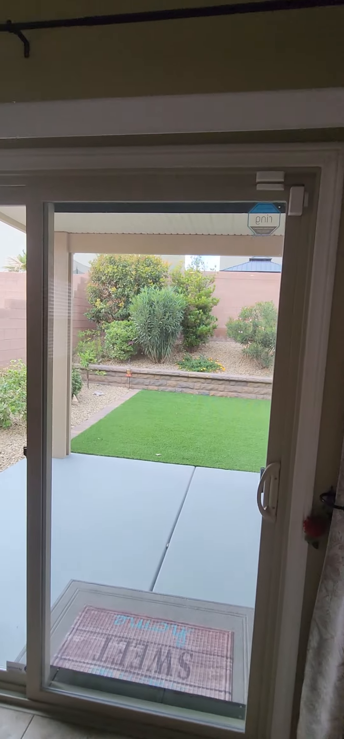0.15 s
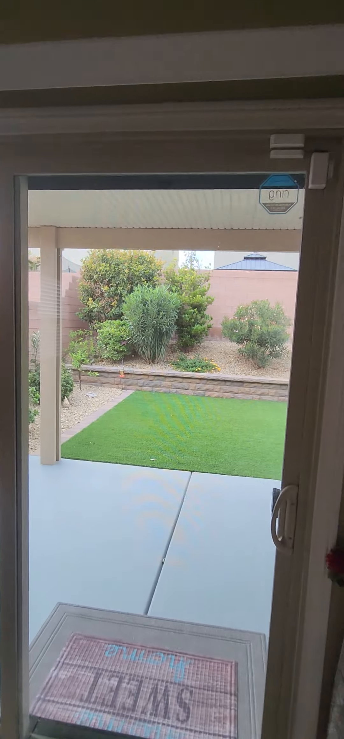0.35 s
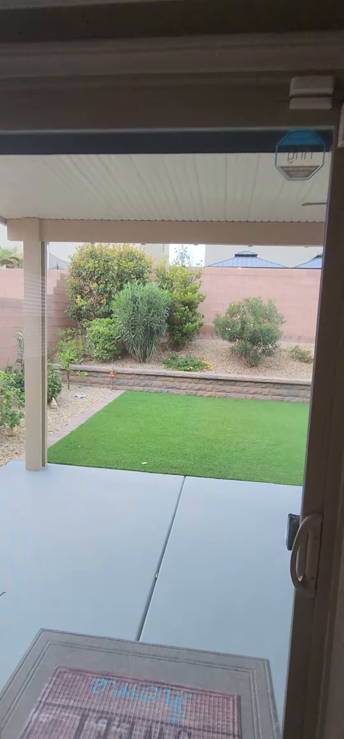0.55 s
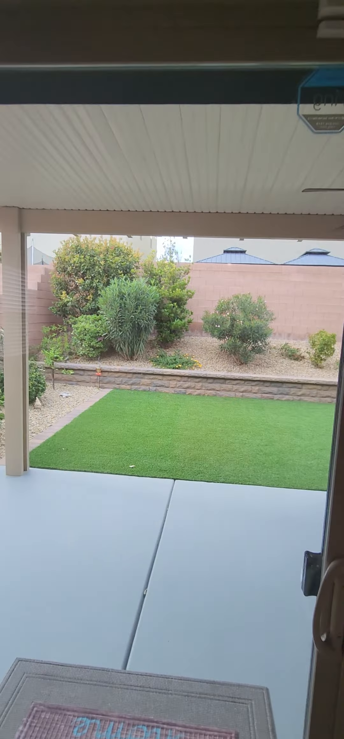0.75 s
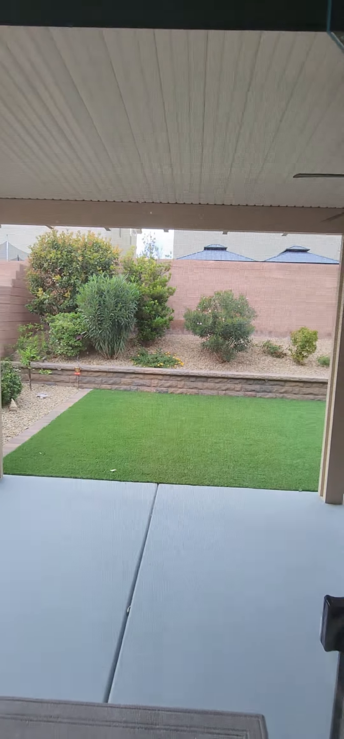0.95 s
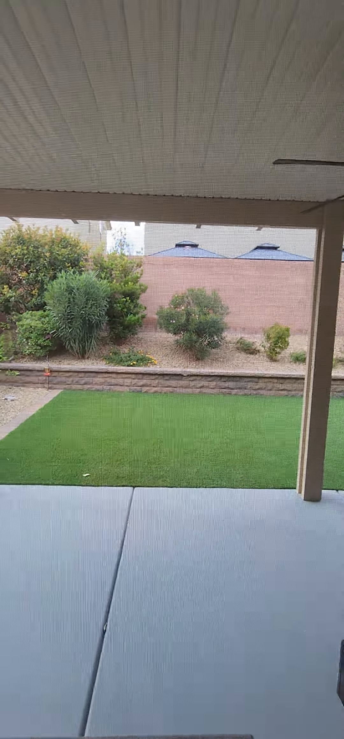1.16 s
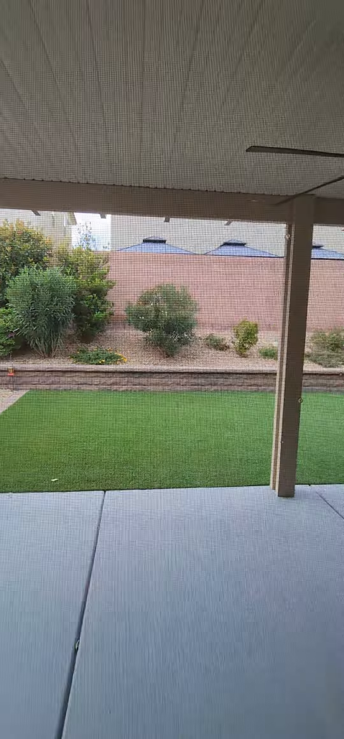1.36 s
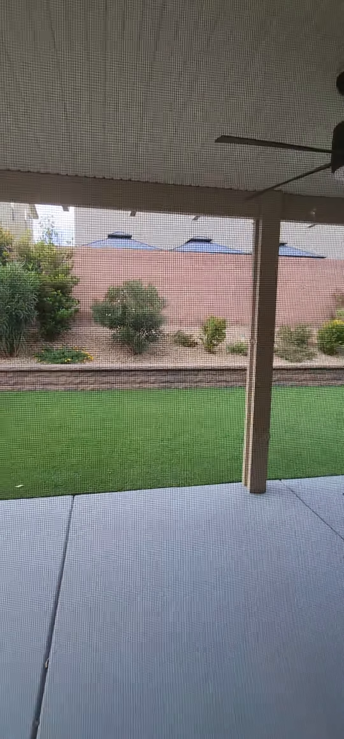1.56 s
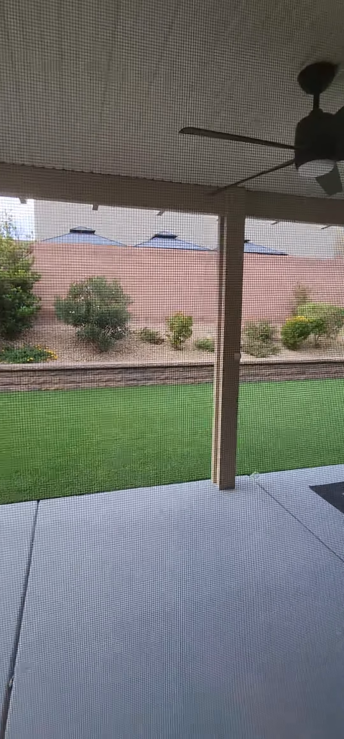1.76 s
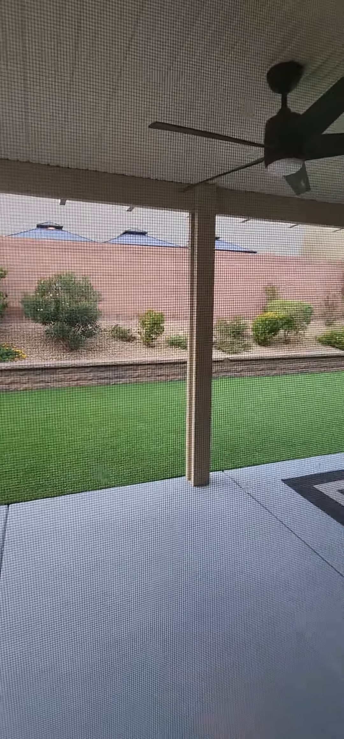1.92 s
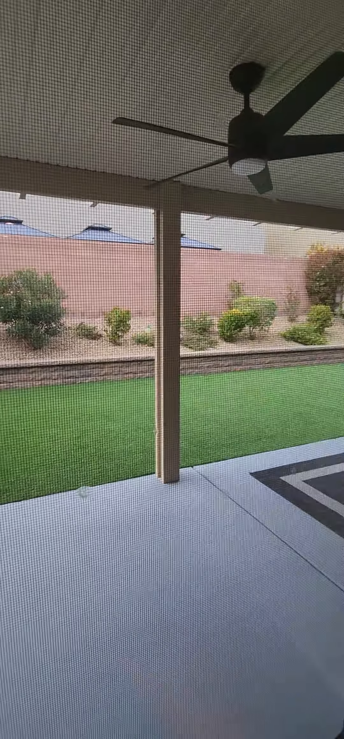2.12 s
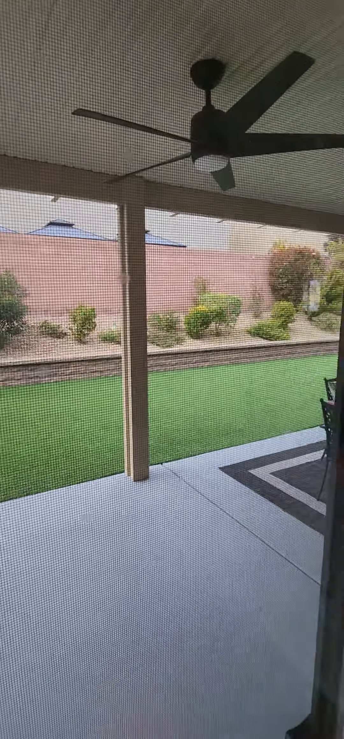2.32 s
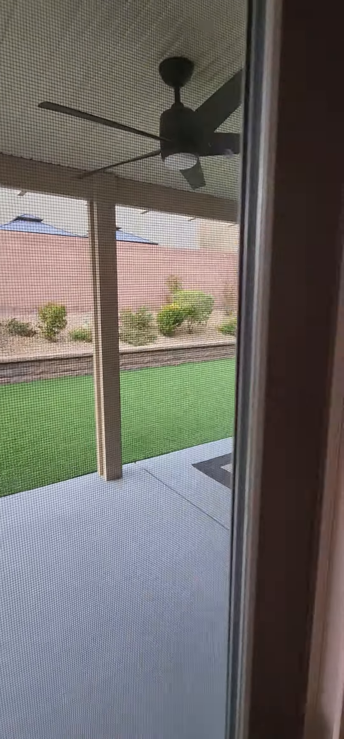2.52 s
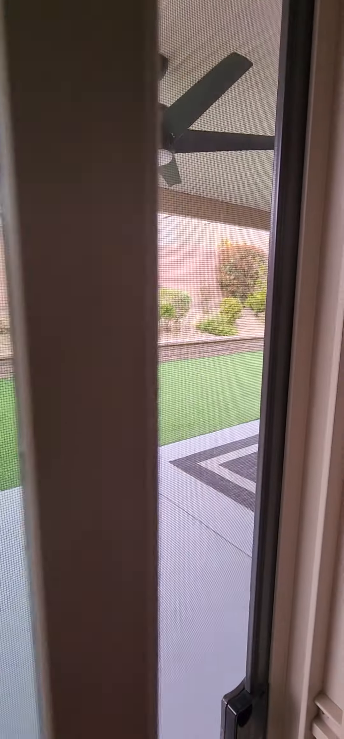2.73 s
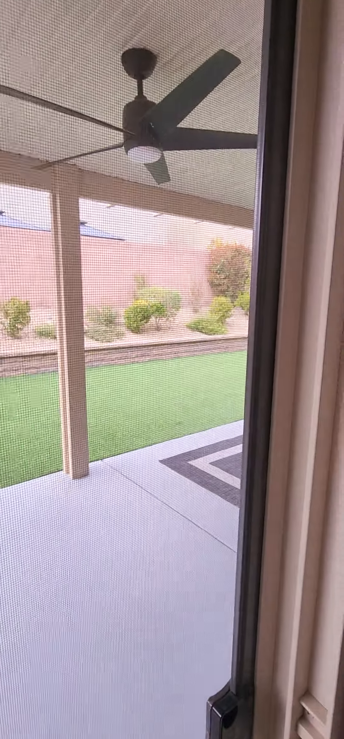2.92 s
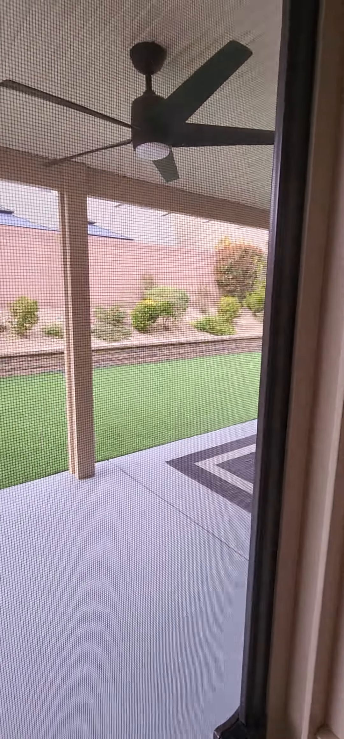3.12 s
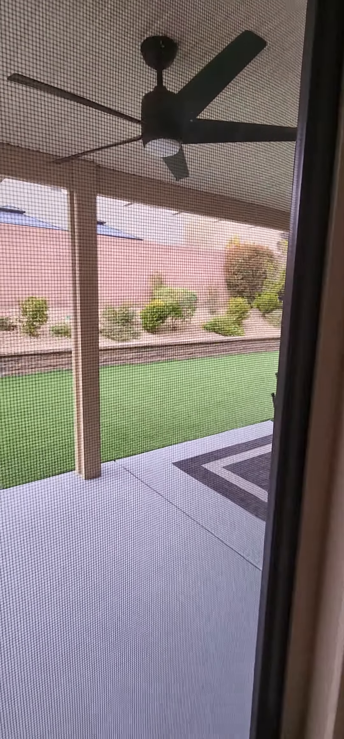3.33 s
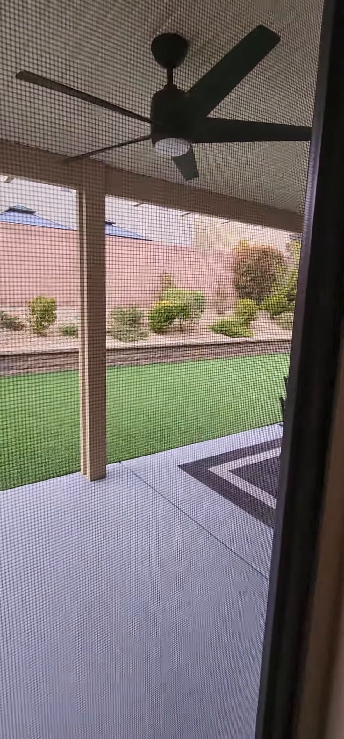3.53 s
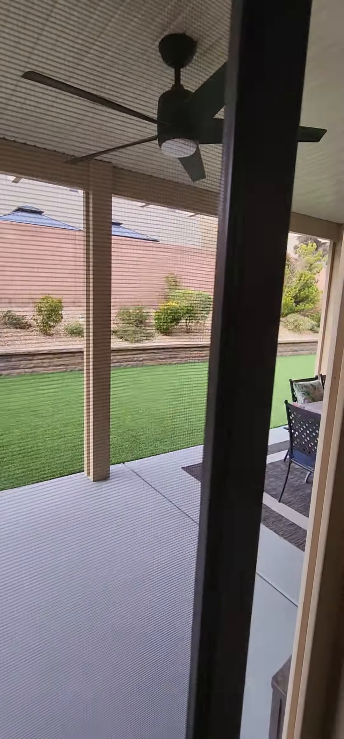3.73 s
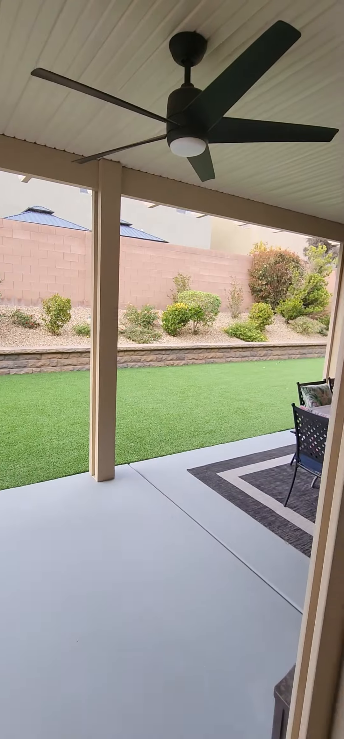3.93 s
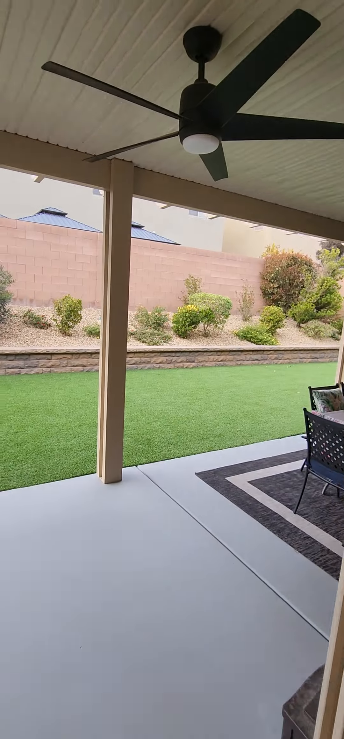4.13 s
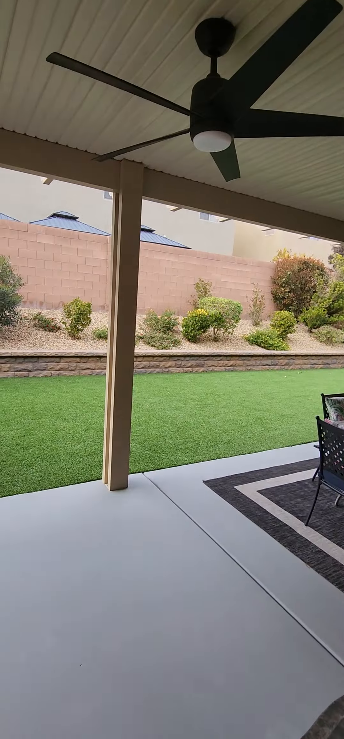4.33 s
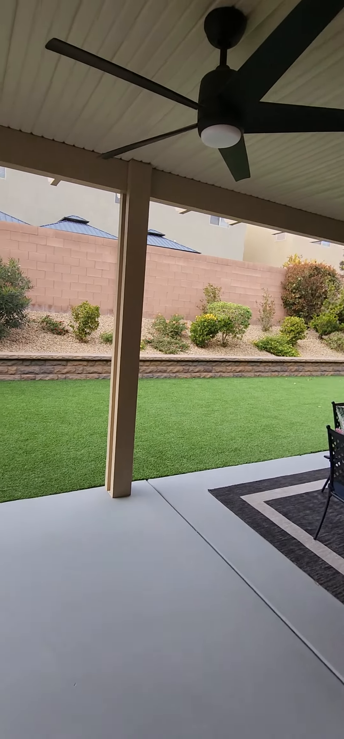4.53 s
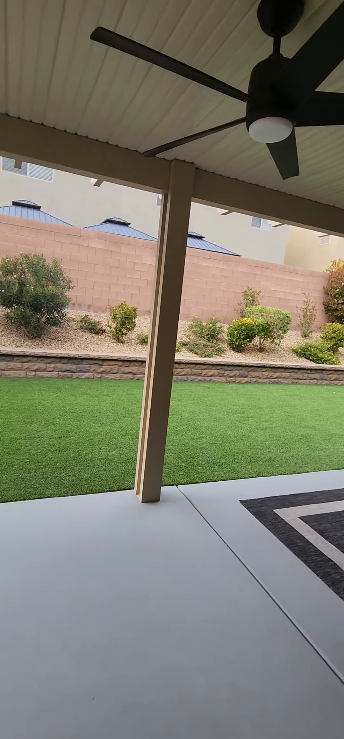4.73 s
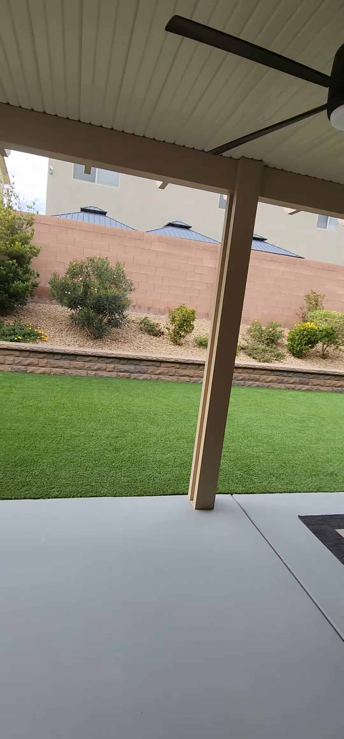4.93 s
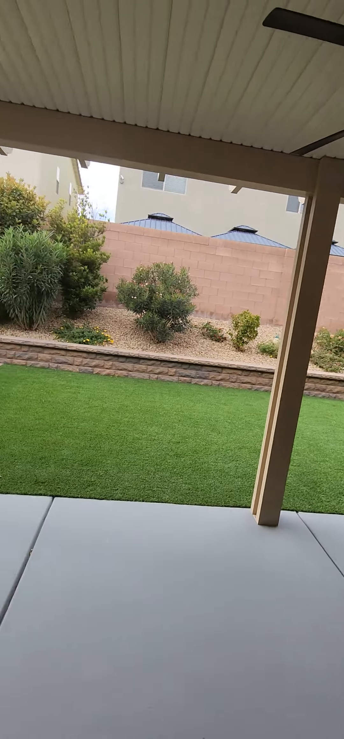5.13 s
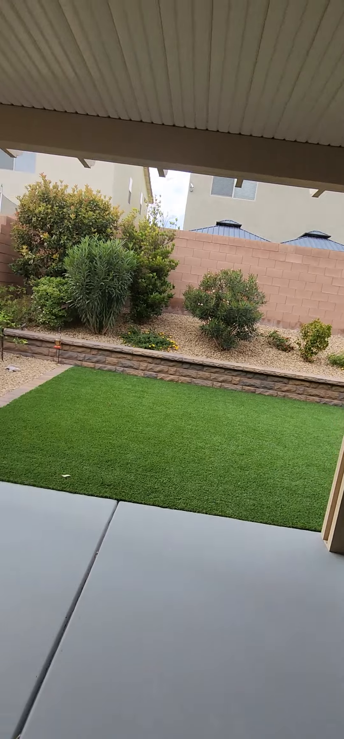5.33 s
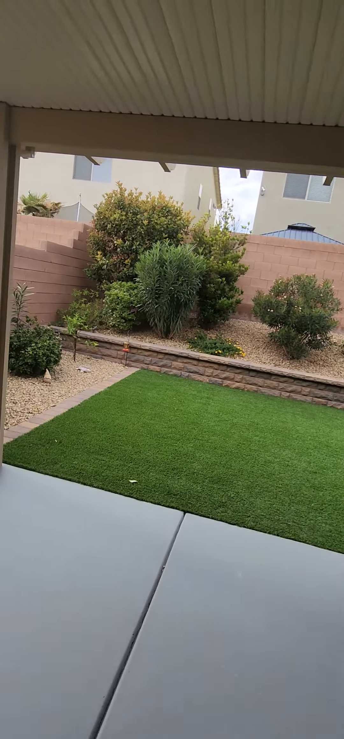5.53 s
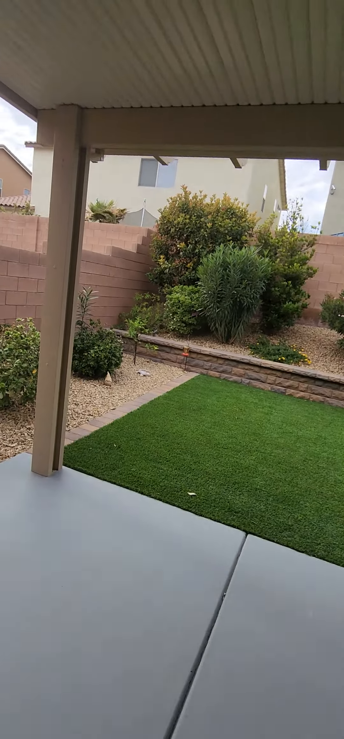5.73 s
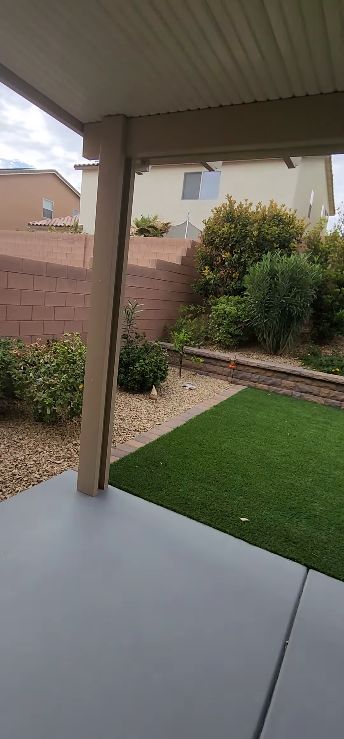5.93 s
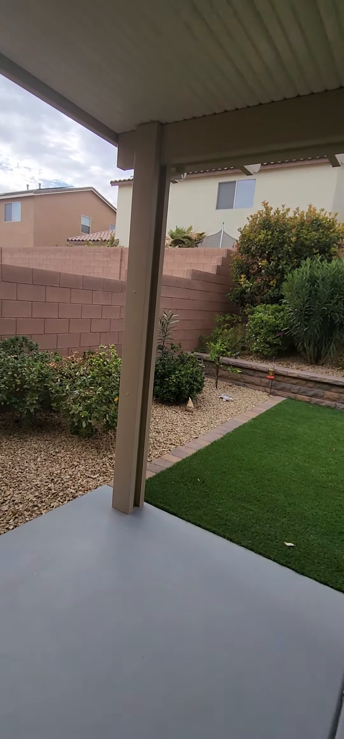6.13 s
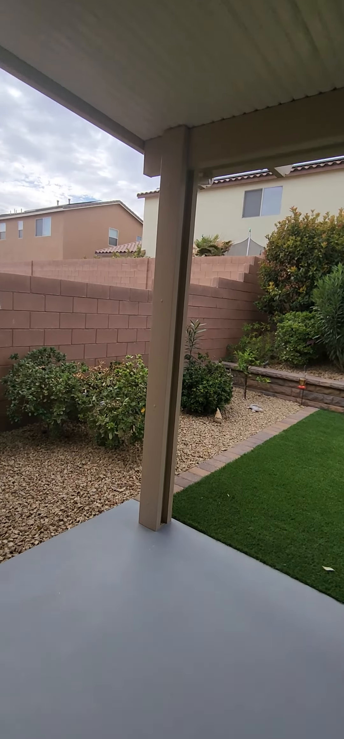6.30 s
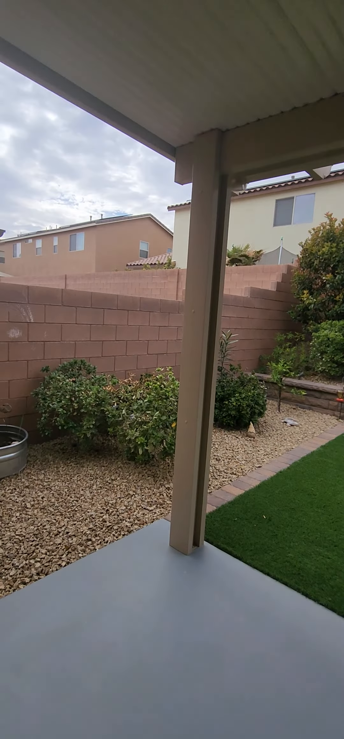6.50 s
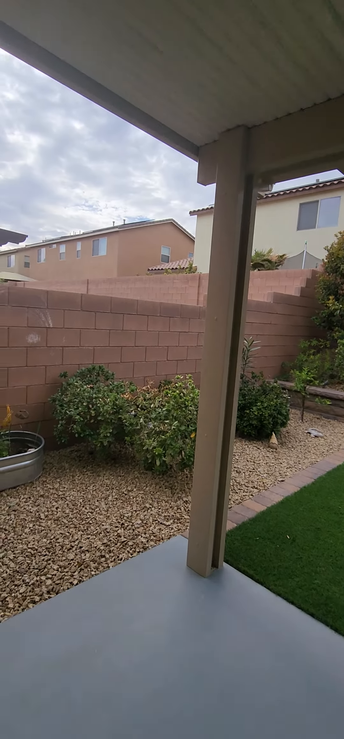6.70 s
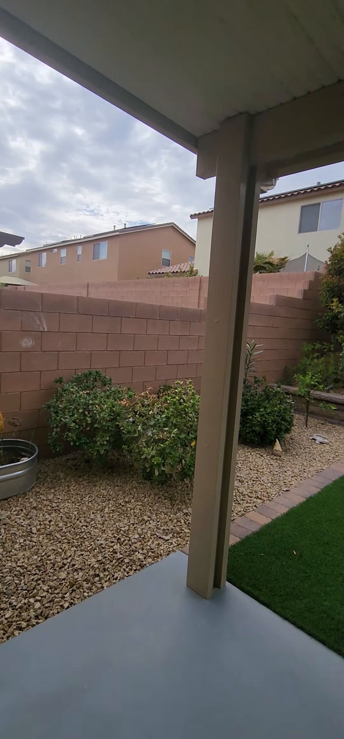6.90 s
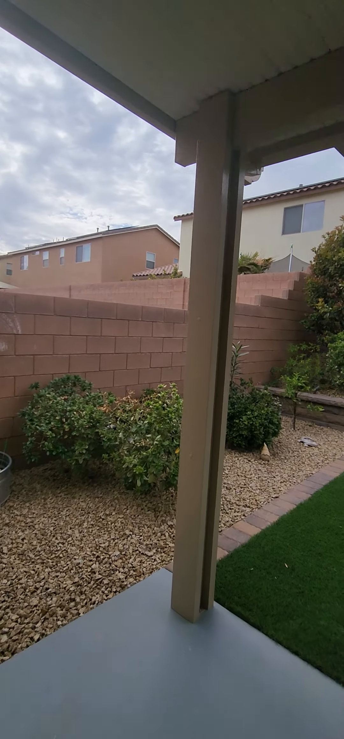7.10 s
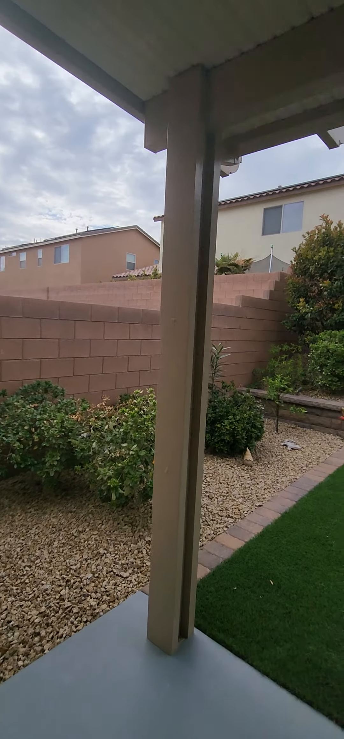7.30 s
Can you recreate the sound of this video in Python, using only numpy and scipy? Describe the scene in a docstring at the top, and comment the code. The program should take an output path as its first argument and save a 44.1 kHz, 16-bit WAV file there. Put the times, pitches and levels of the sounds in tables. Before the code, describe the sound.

A sliding glass door unlatches with a sharp metallic snap and rumbles open, then a screen door rattles aside and footsteps go outside.

```python
"""A living room with a sliding glass patio door, heard from a phone in the hand.
Soles scuff over a hard floor; the sprung latch snaps open and rings the aluminium frame.
The handle squeaks; the panel tears from its seal with a low boom and rumbles along the track.
The light screen door rattles aside on worn rollers. Steps lead into a quiet yard; a far car passes."""
import sys
import numpy as np
from scipy import signal
from scipy.fft import rfft, irfft
from scipy.io import wavfile
from scipy.ndimage import uniform_filter1d

SR = 44100
rng = np.random.default_rng(int(sys.argv[2]) if len(sys.argv) > 2 else 0)


def bounce(signal):
    """Save signal as a 16-bit WAV file at the path given by the first command-line argument."""
    frames = np.transpose(np.atleast_2d(signal))
    limited = np.clip(frames, -1, 1)
    pcm = np.round(limited * 32767).astype(np.int16)
    wavfile.write(sys.argv[1], SR, pcm)


N = 324443
T = np.arange(N) / SR
HIT_T = T[:SR // 2]


def undb(db):
    """Decibels to gain."""
    return 10 ** (np.asarray(db) / 20)


def unit(x):
    """Scale to rms 1."""
    return x / np.sqrt(np.mean(x ** 2))


def peak(x, db):
    """Scale to a peak level."""
    return x * undb(db) / np.abs(x).max()


def add(track, start_s, sound):
    """Mix a sound in at a time."""
    i = int(start_s * SR)
    track[i:i + len(sound)] += sound[:N - i]


def noise():
    """White noise."""
    return rng.standard_normal(N)


def wander(per_s):
    """Random drift, spread near 1."""
    knots = rng.standard_normal(N // 20)
    return np.interp(T * per_s, np.arange(len(knots)), knots)


def grit(per_s, spread_db):
    """Dense tiny contacts of uneven size, rms 1."""
    contacts = (rng.random(N) < per_s / SR) * noise()
    return unit(contacts * undb(spread_db * np.minimum(rng.exponential(size=N), 4)))


def decay(t60_s):
    """Exponential fall, 60 dB in t60_s."""
    return np.exp(-np.log(1000) * HIT_T / t60_s)


def burst(t60_s):
    """Brief rough contact."""
    return rng.standard_normal(len(HIT_T)) * decay(t60_s)


def swell(full_s, rise_s, hold_s, fall_db_per_s):
    """Envelope: ramp up to full_s, hold, die away."""
    rise = np.clip(1 + (T - full_s) / rise_s, 0, 1)
    return rise * undb(-fall_db_per_s * np.maximum(T - full_s - hold_s, 0))


def band(x, lo_hz, hi_hz, order=2):
    """Causal band-pass."""
    sos = signal.butter(order, [lo_hz, min(hi_hz, .49 * SR)], "band", fs=SR, output="sos")
    return signal.sosfilt(sos, x + 1e-18)


def convolve(x, response):
    """Apply a response scaled to unit energy."""
    return signal.oaconvolve(x, response / np.linalg.norm(response))[:N]


def colour(x, points, size=4096):
    """Minimum-phase filter through (f/Hz, level/dB) points."""
    hz, db = np.transpose(points)
    bins_hz = np.maximum(np.fft.rfftfreq(size, 1 / SR), 1)
    gain = undb(np.interp(np.log(bins_hz), np.log(hz), db))
    cepstrum = irfft(np.log(gain))
    cepstrum[1:size // 2] *= 2
    cepstrum[size // 2 + 1:] = 0
    return convolve(x, irfft(np.exp(rfft(cepstrum))))


def ringing(x, modes):
    """A struck part rings in its modes."""
    return convolve(x, sum(undb(db) * decay(t60) * np.sin(2 * np.pi * hz * HIT_T)
                           for hz, db, t60 in modes))


def rattling(x, resonances, flicker_db=5):
    """A loose hollow frame favours now one resonance, now another."""
    return x + sum(undb(db + flicker_db * wander(28)) * band(x, hz - width / 2, hz + width / 2, order=1)
                   for hz, width, db in resonances)


# living room reverberation: f/Hz, t60/s
ROOM_DECAY = [(100, 1), (500, 0.55), (2000, .55), (6000, 0.33), (14000, 0.18)]

def place(x, lag_ms, near_db, room_db):
    """Direct sound, lagged on the left; glass and jamb reflections shifting with the hand; room tail."""
    edges_hz = np.geomspace(40, 20000, 10)
    hz, t60 = np.transpose(ROOM_DECAY)
    ports = np.array([np.roll(x, round(lag_ms * SR / 1000)), x])
    for port in ports:
        tail = sum(band(burst(np.interp(np.log(lo * hi) / 2, np.log(hz), t60)), lo, hi)
                   for lo, hi in zip(edges_hz, edges_hz[1:]))
        port += undb(room_db) * convolve(x, tail * np.minimum(HIT_T / .012, 1))
        for k in range(3):
            reflection = (burst(.035) * (HIT_T > .0006))[:2048]
            sway = np.sqrt(2 / 3) * np.cos(2 * np.pi * (1.3 * T + k / 6))
            port += undb(near_db) * sway * convolve(x, reflection)
    return ports / np.sqrt(1 + undb(2 * near_db) + undb(2 * room_db))


def spread(draw, lag_ms, apart_db, room_db):
    """Extended source: one part shared by both microphone ports, one of its own for each."""
    shared = place(draw(), lag_ms, -20, room_db)
    apart = undb(apart_db) * np.array([draw(), draw()])
    return (shared + apart) / np.sqrt(1 + undb(2 * apart_db))


# still air, indoors and out: f/Hz, level/dB
HOUSE_SPECTRUM = [(25, -9.5), (58, 4), (100, -5), (190, -15), (285, -3), (450, -19), (700, -13.5),
                  (1100, -25), (1700, -24.5), (2800, -31.5), (5500, -37), (7400, -31), (10000, -47.5),
                  (15000, -43)]
YARD_SPECTRUM = [(25, -8), (45, 1), (90, -11), (130, -10.5), (190, -23.5), (300, -20.5), (500, -29.5),
                 (1100, -27.5), (1700, -35), (2800, -45), (5500, -52), (7400, -47), (10000, -66.5),
                 (15000, -56)]

def air(house_db=-59.5, yard_db=-53.5):
    """House quiet gives way to the yard: low town rumble, far air conditioner."""
    outside = np.clip((T - 2.3) / 2.45, 0, 1)
    long_waves = band(noise(), 15, 260, order=1)  # alike at both ports
    ports = []
    for _ in range(2):
        field = (long_waves + band(noise(), 260, 21000, order=1)) * undb(.7 * wander(6))
        house = unit(colour(field, HOUSE_SPECTRUM)) * undb(house_db)
        yard = unit(colour(field, YARD_SPECTRUM)) * undb(yard_db)
        ports.append(house * np.sqrt(1 - outside) + yard * np.sqrt(outside))
    conditioner = undb(-62) * unit(band(noise(), 130.9, 138))
    return np.array(ports) + conditioner * outside


# rubbing on the way to the door: t/s, length/s, level/dB
FAINT_RUBS = [(0, 0.055, -61), (.4, .14, -66), (.6, 0.15, -74), (.77, .11, -69)]

def rubs(hz=1740):
    """Faint friction with a narrow, papery note."""
    envelope = np.zeros(N)
    for s, length, db in FAINT_RUBS:
        add(envelope, s, undb(db) * np.hanning(int(length * SR)))
    friction = unit(band(grit(3000, 1.5), hz / 1.17, hz * 1.12))
    return place(friction * envelope, lag_ms=.17, near_db=-6, room_db=-9)


# t/s, level/dB, slap re thud/dB, thud f/Hz, slap f/Hz, room send/dB
FOOTFALLS = [(.357, -53.5, -14, 275, 1400, 2), (.509, -39.5, 3, 400, 1630, -9),
             (.565, -45, -16, 290, 1500, -11), (.893, -32, -9, 325, 1100, -6.5),
             (.995, -38.5, -5.5, 323, 1500, -8), (1.279, -35.5, -22, 310, 1400, -1.5),
             (4.42, -29.5, -16, 350, 1400, -15), (5.297, -34.5, -4, 440, 1400, -17),
             (5.662, -25, -21, 305, 1750, -11), (6.498, -47, -1, 350, 1400, -21),
             (7.03, -47.5, -21, 402, 1398, -8)]

def feet():
    """Soft thud, ringing hollow underfoot, slap of the sole; room and patio roof answer."""
    close, echoing = np.zeros((2, N))
    for s, db, slap_db, hz, slap_hz, room_db in FOOTFALLS:
        thud = peak(band(burst(.06), hz / 1.9, hz * 1.35, order=3), db)
        hollow = peak(band(burst(.24), hz / 1.12, hz * 1.3), db - 12)
        slap = peak(band(burst(.069), slap_hz / 1.25, slap_hz * 1.22), db + slap_db)
        add(close, s, thud + hollow + slap)
        add(echoing, s, (thud + slap) * undb(room_db))
    return place(close, .1, -7.5, -22) + undb(1) * place(echoing, .33, 0, 12)


# slipper drags: t/s, rise/s, hold/s, level/dB, sag/(dB/s)
SOLE_DRAGS = [(0.359, .012, 0.1, -62, 13), (0.897, .008, .072, -51.5, 21), (1.284, .009, .04, -45.5, 110),
              (1.346, 0.026, .14, -35.5, 115)]
# t/s, length/s, level/dB
CLOTH_BRUSHES = [(5.14, 0.42, -73), (5.794, 0.07, -71), (6.381, 0.23, -76), (7.022, 0.086, -77.5),
                 (7.15, 0.11, -69)]
# sole and cloth friction: f/Hz, level/dB
SCUFF_SPECTRUM = [(250, -22), (800, -10), (1400, -5), (2300, -2), (4500, 1.5), (6000, -3.5), (7500, 2),
                  (9500, -10), (12000, -2), (15000, -4.5)]

def scuffs(lift_db_per_s=260):
    """Soles drag, slow and lift; cloth brushes faintly."""
    envelope = sum(undb(db - sag * np.maximum(T - s, 0)) * swell(s, rise, hold, lift_db_per_s)
                   for s, rise, hold, db, sag in SOLE_DRAGS)
    for s, length, db in CLOTH_BRUSHES:
        add(envelope, s, undb(db) * np.hanning(int(length * SR)))
    return undb(2.5) * spread(lambda: colour(grit(15000, .98), SCUFF_SPECTRUM) * envelope, .45, 4.8, -6.5)


def flex(modes, push_hz, db, width_octaves=.55, attack_s=.011):
    """A soft push swings the modes near its own pitch, with a little rattle."""
    out = 0
    for hz, mode_db, t60 in modes:
        rattle = undb(-7) * unit(band(rng.standard_normal(len(HIT_T)), hz / 1.7, hz * 1.7))
        swing = np.sin(2 * np.pi * hz * HIT_T) + rattle
        coupling = np.exp(-(np.log2(hz / push_hz) / width_octaves) ** 2)
        out += undb(mode_db) * coupling * swing * decay(t60)
    return peak(out * np.minimum(HIT_T / attack_s, 1), db)


# glass panel flexure: f/Hz, level/dB, t60/s
PANEL_MODES = [(55, 0, 0.65), (75, -4, 0.48), (98.6, 0, 0.32), (140, 0, 0.26), (197.7, -1, .25)]
# a footstep, then the glass panel: t/s, level/dB, favoured f/Hz (softer is lower)
LOW_BUMPS = [(.9, -43.5, 140), (1.315, -38.5, 105), (1.52, -28.5, 106), (1.899, -34, 181),
             (1.956, -37.5, 183.4), (2.2, -22.5, 150), (2.235, -19, 74.3), (2.45, -36, 55)]
# t/s, level/dB
SCREEN_JOLTS = [(3.322, -34.5), (3.44, -36)]

def bumps(screen_hz=116, screen_t60_s=.31):
    """Low thump of a footstep, then booms of the flexing glass panel and screen."""
    out = np.zeros(N)
    for s, db, hz in LOW_BUMPS:
        add(out, s, flex(PANEL_MODES, hz, db))
    for s, db in SCREEN_JOLTS:
        add(out, s, flex([(screen_hz, 0, screen_t60_s)], screen_hz, db))
    return place(out, .3, -18, -19)


# lever, hook and bounces: t/s, level/dB, t60/s, boom re blow/dB
LATCH_BLOWS = [(1.478, -22, .03, -2), (1.4876, -22, .012, 0), (1.5008, -3.5, .011, -30),
               (1.5072, -11, .012, -10), (1.5105, -4, .016, 8), (1.5154, -2, .016, -7),
               (1.5325, -11, .026, 4), (1.541, -22, .02, 13), (1.5817, -23, .02, -2)]
# f/Hz, level/dB
LATCH_SPECTRUM = [(60, -35), (150, -20), (400, -16), (900, -16), (1600, -9), (2200, -3.5), (2900, -2.5),
                  (4000, -7.5), (6800, -5), (8500, -11.5), (12000, -18), (15000, -11)]
# hook lands, lever drops back: t/s, level/dB
FRAME_SHAKES = [(1.516, -3), (1.802, -24)]
# aluminium frame with pane, hollow upright, boom of a heavy blow: f/Hz, level/dB, t60/s
FRAME_MODES = [(145, -9, 0.38), (307, -15, 0.4), (409, -2, 0.22), (624, -14, 0.5), (743, -3, 0.45),
               (834, -12, 0.18), (942, -11, 0.18), (1798, -15, 0.37), (1997, -22, 0.71), (2159, -14, 0.39),
               (2708, -17, 0.51), (2832, -17, 0.5), (3063, -8, 0.23), (4183, -22, 0.4), (4538, -19, 0.34),
               (5448, -17, 0.32), (6422, -23, 0.34), (6476, -18, 0.3), (7095, -18, 0.29), (7402, -18, 0.28),
               (7639, -12, 0.19), (7978, -20, 0.23)]
STILE_MODES = [(1094, -2, .09), (1205, -3, .11), (1313, -4, 0.13), (2528, -3, 0.2), (2750, -3, .18),
               (2920, -3, .16), (6626, -4, .13), (7500, -5, .13)]
BOOM_MODES = [(370, -13, .09), (560, -16, .06), (790, -8, .045), (1072, 1, .035), (1280, -5, .035)]

def latch():
    """The sprung hook snaps over in bright metal blows that boom in the upright and shake the frame."""
    blows, kicks, shakes = np.zeros((3, N))
    for s, db, t60, boom_db in LATCH_BLOWS:
        add(blows, s, peak(burst(t60), db))
        add(kicks, s, undb([db + boom_db]))
    for s, db in FRAME_SHAKES:
        add(shakes, s, undb([db]))
    frame = undb(-1.5) * ringing(band(shakes, 110, 7500, order=1), FRAME_MODES)
    stile = undb(-3) * ringing(shakes, STILE_MODES)
    boom = undb(3.5) * band(ringing(kicks, BOOM_MODES), 330, 2200)
    snap = place(colour(blows, LATCH_SPECTRUM), .29, -5, -11.5)
    return undb(6.5) * (snap + place(frame + stile + boom, .2, -9, -11))


# handle, tearing seal, footsteps: t/s, level/dB, f/Hz
SHORT_CLICKS = [(1.603, -10, 2880), (1.758, -17, 3700), (1.768, -28, 2500), (1.792, -27, 1200),
                (1.802, -34.5, 4300), (1.803, -31.5, 900), (1.807, -38, 370), (1.936, -25.5, 1830),
                (2.005, -27.5, 4830), (2.015, -23.5, 4000), (2.207, -23, 3830), (2.229, -21, 5000),
                (3.263, -29, 3870), (3.3056, -20.5, 4700), (3.3088, -22, 4700), (3.313, -33.5, 890),
                (5.299, -38, 2900), (7.176, -45, 1750)]
# rollers on dents and grit: t/s, level/dB, f/Hz
TRACK_DENTS = [(2.495, -37, 3500), (2.602, -40, 2400), (2.667, -33, 2200), (2.8, -37, 2000),
               (2.868, -38, 1800), (2.897, -29, 1300), (3.448, -32, 3700), (3.5, -32.5, 4500),
               (3.586, -33.5, 3800), (3.639, -30.5, 3300), (3.724, -27, 2600), (3.812, -29, 2900),
               (3.976, -26, 2000), (3.987, -27.5, 2700), (4.044, -26, 3600), (4.123, -28, 3020),
               (4.162, -30, 2600), (4.24, -30.5, 3400), (4.324, -28, 2600), (4.341, -27, 5000),
               (4.4234, -23.5, 7500), (4.56, -30.5, 4000), (4.68, -27, 2380), (4.718, -36, 5500),
               (4.764, -30.5, 2000), (4.82, -30, 2120)]

def clicks():
    """Short clicks and ticks from the handle, tearing seal, rollers and footsteps; each rings briefly."""
    out = np.zeros(N)
    for s, db, hz in SHORT_CLICKS + TRACK_DENTS:
        tick = peak(band(burst(.01), hz / 2.82, hz * 1.58), db)
        ring = peak(band(burst(.029), hz / 1.093, hz * 1.123), db - 9)
        add(out, s, tick + ring)
    return undb(2.5) * place(out + undb(-18.5) * ringing(out, FRAME_MODES), .3, -7, -13)


def sand(pace):
    """Grains crack under the rollers, louder with speed."""
    return undb(-50.5) * pace ** .97 * band(grit(per_s=230, spread_db=2.5), 1200, 11000, order=1)


# panel pulled open, then coasting: t/s, share of full speed
GLASS_PACE = [(2.15, 0), (2.23, 1), (2.35, 0.73), (2.47, 0.99), (2.66, 0.96), (2.89, 0.67), (3.05, 0.31),
              (3.22, 0.07), (3.3, 0.14)]
# wheels, brush strip: f/Hz, level/dB
WHEEL_SPECTRUM = [(15, -46), (35, -14.5), (60, -3), (105, 2), (160, -2.5), (280, 4.5), (400, -0.5),
                  (520, -1), (650, 2.5), (800, -4.5), (1100, -9.5), (2000, -27), (5000, -93)]
STRIP_SPECTRUM = [(500, -30), (1000, -10), (1500, -3), (2200, -5.5), (3000, -12.5), (4200, -11.5),
                  (5500, -17.5), (7500, -16.5), (10000, -21), (12000, -13.5), (15000, -19)]
# bottom rail: f/Hz, width/Hz, level/dB
RAIL_RESONANCES = [(1316, 57, -6), (1500, 89, -4.5), (2120, 110, -2.5), (3270, 57, -3), (3960, 150, -1.5)]

def glass_door():
    """The pull strains the brush strip; then wheels rumble and the strip hisses with speed."""
    pace = np.interp(T, *np.transpose(GLASS_PACE), left=0, right=0)
    strain = swell(1.957, rise_s=.074, hold_s=.215, fall_db_per_s=452)
    wheels = unit(colour(grit(3000, 1.9), WHEEL_SPECTRUM) * undb(.85 * wander(25.12)))
    rumble = wheels * (undb(-37) * pace + undb(-54) * strain)
    drag = (undb(-46.5) * pace ** .86 + undb(-48.5) * strain) * undb(2 * wander(60))

    def strip():
        return rattling(colour(grit(7000, 1.6), STRIP_SPECTRUM), RAIL_RESONANCES) * drag

    return spread(strip, .42, 1, -2.5) + place(rumble + undb(-9.5) * sand(pace), .39, -7.5, -11)


# t/s, rise/s, hold/s, f/Hz, glide/(Hz/s), level/dB
HANDLE_SQUEAKS = [(2.052, .007, 0.013, 1510, -4000, -40), (2.108, 0.039, .007, 1720, 5000, -33),
                  (2.125, .007, .012, 2150, 6000, -47)]

def squeaks():
    """The pulled handle sticks and slips: short wavering glides, strong odd partials."""
    out = np.zeros(N)
    for s, rise, hold, hz, glide, db in HANDLE_SQUEAKS:
        pitch_hz = (hz + glide * np.clip(T - s, -hold, 2 * hold)) * (1 + .018 * wander(500))
        phase = 2 * np.pi * np.cumsum(pitch_hz) / SR
        tone = sum(undb(partial_db) * np.sin(k * phase) for k, partial_db in enumerate([0, -13, -9], 1))
        out += undb(db) * unit(tone) * np.sqrt(swell(s, rise, hold, 3600))
    return place(out, -.54, -14, -14)


# seal crunching, seal tearing: f/Hz, level/dB
CRUNCH_SPECTRUM = [(400, -23), (900, -3), (1300, -1), (2200, -1.5), (2800, -12), (6000, -32)]
TEAR_SPECTRUM = [(120, -11), (300, 0.5), (600, -11.5), (1000, -3), (1600, -5), (2300, -6), (4000, -7.5),
                 (6500, -17.5), (10000, -29), (15000, -26)]

def seal():
    """The weather seal crunches against the frame and crackles loose."""
    peel = undb(-31) * swell(2.195, rise_s=.042, hold_s=.0092, fall_db_per_s=400)
    release = undb(-28.5) * swell(2.2, rise_s=.044, hold_s=.035, fall_db_per_s=452)

    def crunch():
        return rattling(colour(grit(1500, 2.3) * peel, CRUNCH_SPECTRUM), RAIL_RESONANCES)

    def tear():
        return colour(grit(4500, 2.9), TEAR_SPECTRUM) * release

    return spread(tear, .1, .56, -7) + spread(crunch, .1, -3, -10)


# screen nudged, shoved, let run out: t/s, speed/(turns/s)
ROLLER_SPEED = [(3.34, 3.2), (3.43, 16), (3.58, 15.3), (3.68, 25.8), (3.8, 55), (3.99, 62), (4.15, 41.6),
                (4.5, 33.4), (4.7, 27), (4.83, 17.2), (4.87, 4), (4.94, 0.49)]
# screen binds in its track: t/s, width/s, boost/dB
SCREEN_BINDS = [(3.812, 0.031, 3.5), (3.9, .018, 1.5), (3.995, 0.04, 3)]
# track scrape, frame shudder: f/Hz, level/dB
SCRAPE_SPECTRUM = [(400, -7.5), (800, -4.5), (1100, -0.5), (1600, 2), (2200, -4.5), (3000, -4), (4000, -7),
                   (5400, -18), (7500, -15.5), (10000, -23), (12000, -17), (15000, -22)]
SHUDDER_SPECTRUM = [(40, -42), (90, -5), (140, -13), (200, -4.5), (290, -1), (380, -5.5), (500, -12),
                    (700, -10), (1300, -40), (3000, -88)]
# thin frame: f/Hz, width/Hz, level/dB
SCREEN_RESONANCES = [(296, 23, -5), (359, 25, -9.5), (1556, 51, -2.5), (2160, 77, -3), (2500, 56, -6),
                     (2920, 90, -5), (3730, 200, -4), (5580, 220, -2)]

def screen_door(full_turns_per_s=60, knock_s=.0042, scatter_db=2.5):
    """A worn roller knocks once a turn, shaking the light frame in a puff of tiny contacts."""
    speed = np.maximum(np.interp(T, *np.transpose(ROLLER_SPEED), left=0, right=0), 1e-6)
    pace = speed / full_turns_per_s
    turns = np.cumsum(speed * (1 + .16 * wander(40))) / SR
    force = undb(scatter_db * rng.standard_normal(N // 100))[turns.astype(int)]
    force *= np.clip(speed / 32, 0, 1) ** 3  # quiet at a crawl
    force *= np.minimum(38 / speed, 1)  # fast rollers skim
    age_s = turns % 1 / speed
    shake = .6 + 2.1 * force * np.exp(-age_s / knock_s) * np.minimum(age_s / .001, 1)
    bind_db = sum(db * np.exp(-((T - s) / width) ** 2) for s, width, db in SCREEN_BINDS)
    hand_grip = undb(-38.5) * swell(3.266, rise_s=.0038, hold_s=0, fall_db_per_s=331)
    drag = undb(-37 + bind_db) * pace ** .97 + hand_grip

    def frame(contacts, spectrum):
        return rattling(colour(contacts * shake, spectrum), SCREEN_RESONANCES)

    scrape = undb(1.1) * spread(lambda: frame(grit(7000, 1.4), SCRAPE_SPECTRUM) * drag, .44, 0, -11)
    turns_per_s2 = uniform_filter1d(np.gradient(speed, T), size=SR // 8)
    push_db = 3 * np.tanh(turns_per_s2 / 50)
    shudder = frame(grit(3000, 2), SHUDDER_SPECTRUM) * undb(-42.5 + push_db) * pace ** 1.05
    return scrape + place(shudder + sand(pace), .34, -11, -10.5)


# tyre noise: t/s, f/Hz, level/dB
CAR_PASS = [(5.4, 750, -76), (5.72, 850, -66), (5.9, 1000, -64), (6.15, 1041, -67), (6.45, 1120, -63),
            (6.74, 1050, -65), (6.9, 1650, -68), (7.08, 1550, -72), (7.35, 1500, -76)]

def car(waver=.06):
    """Far tyres off to one side swell, waver, brighten and fade."""
    s, hz, db = np.transpose(CAR_PASS)
    centre_hz = np.interp(T, s, hz) * (1 + waver * wander(10))
    carrier = np.cos(2 * np.pi * np.cumsum(centre_hz) / SR)
    envelope = undb(np.interp(T, s, db, left=-120) + 1.5 * wander(9))
    return spread(lambda: unit(band(noise(), 5.7, 220) * carrier) * envelope,
                  lag_ms=.5, apart_db=-.5, room_db=-15)


def scene():
    """All sources at the two microphone ports."""
    walker = feet() + scuffs() + rubs()
    doors = latch() + clicks() + bumps() + squeaks() + seal() + glass_door() + screen_door()
    return walker + doors + car() + air()


def record(dry):
    """The right port is brighter and rings at the very top; the phone clips and cuts the treble."""
    left = dry[0] - .13 * band(dry[0], 9000, 17000, order=1)
    right = dry[1] + .68 * band(dry[1], 9000, 19000, order=1) + .5 * band(dry[1], 14400, 15600, order=1)
    lowpass = signal.ellip(8, .2, 70, 16100, fs=SR, output="sos")
    return signal.sosfilt(lowpass, np.clip([left, right], -1, 1))


dry = scene()
out = record(dry)
bounce(out)
```